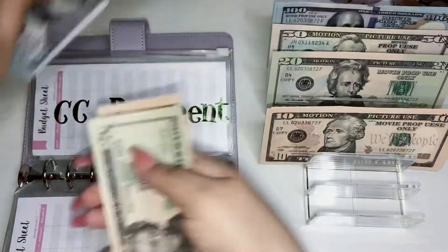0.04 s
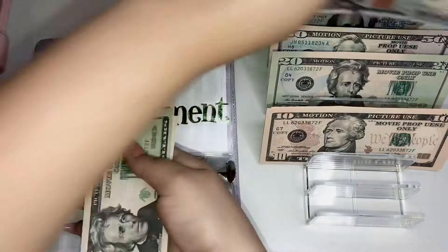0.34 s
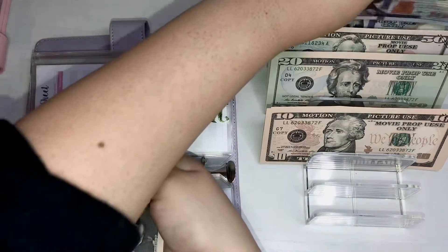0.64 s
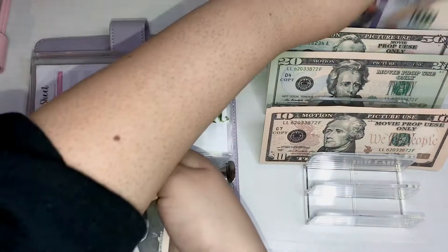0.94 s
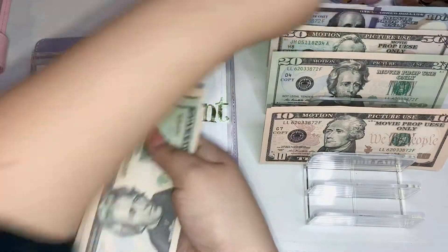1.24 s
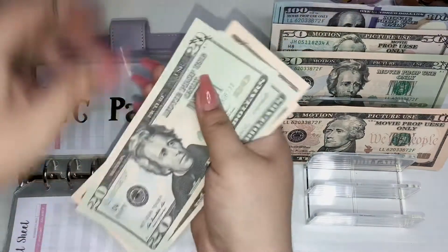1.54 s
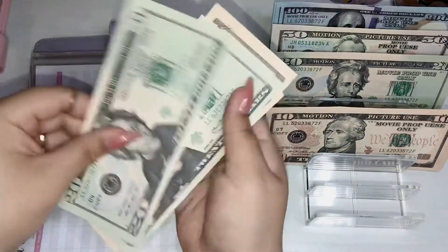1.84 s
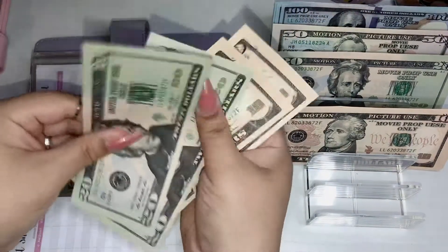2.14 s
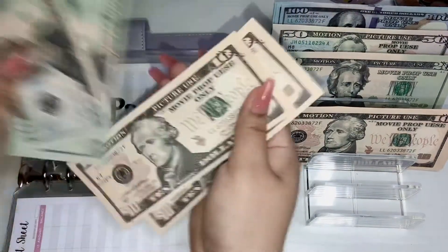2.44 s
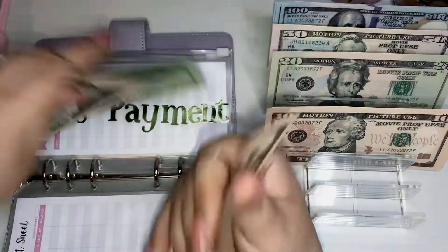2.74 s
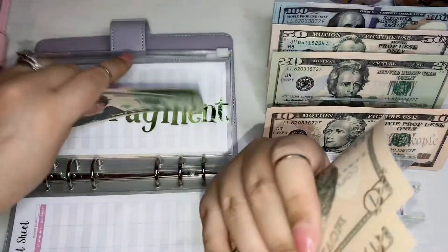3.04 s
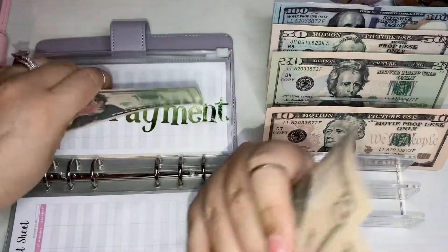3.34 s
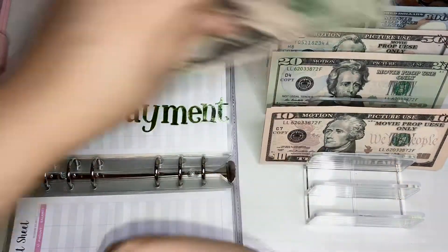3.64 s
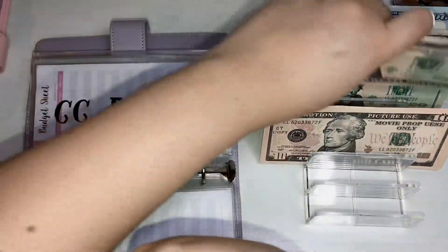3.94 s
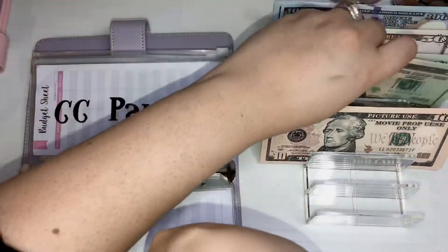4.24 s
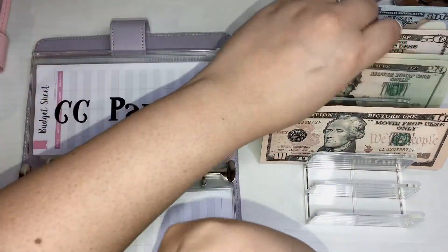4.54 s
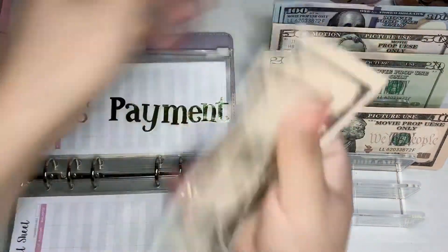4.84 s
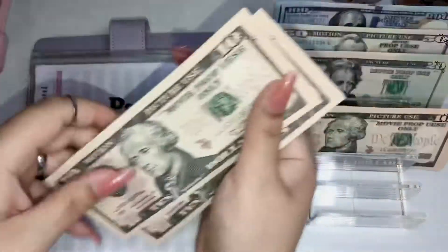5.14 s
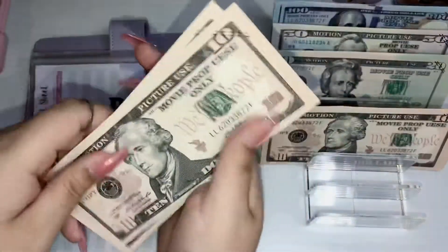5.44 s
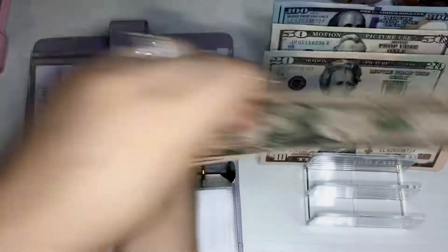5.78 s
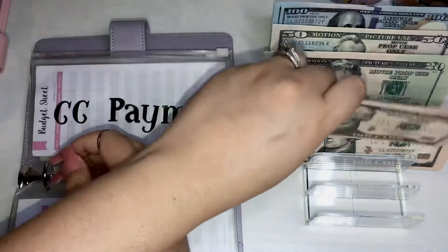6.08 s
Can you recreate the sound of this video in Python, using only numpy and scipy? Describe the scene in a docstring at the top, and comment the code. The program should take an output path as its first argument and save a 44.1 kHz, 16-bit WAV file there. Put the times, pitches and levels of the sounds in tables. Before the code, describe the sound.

Close, crisp handling of paper money: grainy sliding, small snaps and bundles tapping into a plastic tray over a faint hum.

```python
"""Handling paper banknotes

Notes are drawn from a plastic tray, fanned out and laid on a ring binder, close to the microphone.
Sheet slides on sheet with a fine, grainy hiss, and the notes snap and tap as they bend. Twice a bundle
drops back into its slot and knocks the tray. Behind it all is a small, quiet room with a faint hum."""
import sys
import numpy as np
from scipy import signal
from scipy.fft import rfft, irfft
from scipy.io import wavfile

SR = 44100
rng = np.random.default_rng(int(sys.argv[2]) if len(sys.argv) > 2 else 0)


def store_pcm(level_fs):
    """Save levels as 16-bit WAV."""
    pcm = np.round(np.clip(level_fs, -1, 1) * 32767).astype(np.int16)
    wavfile.write(sys.argv[1], SR, np.atleast_2d(pcm).T)


N = 269465
TIME = np.arange(N) / SR

# The paper's tone in three parts, each listed as f/Hz, level/dB:
# the hiss of rubbing fibres
RUB_TONE = [(1200, -19.5), (2200, -3.5), (3000, 0.5), (4300, 1), (6000, -1), (8500, -5), (11000, -23),
            (16000, -22)]
# the lower sound of the whole sheet bending, called its body
BODY_TONE = [(35, -24), (100, -3), (200, -3), (380, 1), (550, -4), (1050, -0.5), (1550, -1.5), (2100, -4.5),
             (3200, -24)]
# the very high hiss of the cut edges
EDGE_TONE = [(6000, -7), (9500, -0.5), (12000, -3.5), (15000, -2.5), (16500, -3)]
# bundles landing in the tray: t/s, level/dB, place (0 = back slot, 1 = front slot)
LANDINGS = [(0.9842, -28.5, 0.037), (4.3315, -38.5, 0.65), (4.3646, -33.5, 0.89), (4.401, -55, 0.55)]


def from_db(db):
    """Turns decibels into a factor to multiply a sound by."""
    return 10 ** (np.asarray(db) / 20)


def unit_level(x):
    """Scales a signal to an average power of 1."""
    return x / np.sqrt(np.mean(x ** 2) + 1e-20)


def at_hz(points, hz):
    """Reads between the rows of a table, giving every octave the same space."""
    known_hz, values = np.transpose(points)
    return np.interp(np.log(np.maximum(hz, 1)), np.log(known_hz), values)


def colour(x, tone, size=2048):
    """Filters a sound to the tone in a table; white noise keeps its power."""
    gains = from_db(at_hz(tone, np.fft.rfftfreq(size, 1 / SR)))
    cepstrum = irfft(np.log(gains))
    # fold the second half onto the first, so the filter rings only after a click, never before
    cepstrum[1:size // 2] *= 2
    cepstrum[size // 2 + 1:] = 0
    response = irfft(np.exp(rfft(cepstrum)))
    return signal.fftconvolve(x, response / np.linalg.norm(response))[:len(x)]


def drift(per_s):
    """A curve that wanders to a new random value per_s times a second."""
    points = rng.standard_normal(int(N / SR * per_s) + 2)
    return unit_level(np.interp(TIME * per_s, np.arange(len(points)), points))


def moving_resonance(x, hz, width_hz):
    """Picks out a band of the sound around a moving pitch."""
    turn = np.exp(2j * np.pi * np.cumsum(hz) / SR)
    decay = np.exp(-np.pi * width_hz / SR)
    return 2 * np.real(turn * signal.lfilter([1 - decay], [1, -decay], x / turn))


def air_and_hum():
    """Ventilation rushes softly and the mains power hums."""
    # ventilation noise: f/Hz, level/dB
    air_tone = [(24, -44), (47, 10), (90, 2.5), (200, 5.5), (400, -8), (800, -9.5), (2000, -17),
                (5000, -22), (10000, -27), (16000, -27)]
    # tones of the hum: f/Hz, level/dB
    hum_tones = [(120, -70.5), (240, -93), (360, -81)]
    hum = sum(np.sqrt(2) * from_db(db) * np.sin(2 * np.pi * (hz * TIME + rng.random()))
              for hz, db in hum_tones)
    air = unit_level(colour(rng.standard_normal(N), air_tone))
    return from_db(-64.5) * air + hum


def finger_strokes():
    """Each stroke grips, swells or fades, then dies away; the loudest one has most say in the tone."""
    # paper sliding over paper or along the tray: start/s, rise/s, length/s, level/dB, swell/dB,
    # then its tone: body/dB, edges/dB, ring/Hz, ring/dB (these three dB values count from the level)
    strokes = [(-0.01, .005, .095, -65, 0, -5.5, -8, 4870, -4),
               (0.087, 0.013, 0.32, -69.5, 0, 0.5, -6, 4800, -3),
               (0.199, .01, 0.069, -68.5, 1, -9, -10, 5500, 4),
               (0.682, .002, 0.23, -63, 2, 0.5, 0.5, 4700, -24),
               (0.909, .02, 0.036, -59, 12, -16, -0.5, 4700, -13),
               (1.241, 0.011, 0.16, -62.5, 11, -10, -3.5, 3300, -13),
               (1.397, .02, 0.11, -56, 4, -9, -1, 6340, 0),
               (1.504, .01, .12, -57, 2.5, -5.5, -2.5, 6440, -21),
               (1.685, .004, 0.07, -64, 5, -1, -3.5, 4500, -17),
               (1.752, 0.043, .19, -54, -2, -5, -2, 4500, -22),
               (1.938, 0.0088, 0.15, -48.5, 2.5, -11, -2.5, 5940, 6.5),
               (2.13, 0.019, 0.038, -52.5, 0, 0, -3, 3500, -15),
               (2.164, .05, 0.29, -52, -2, -9, -1.5, 3800, -0.5),
               (2.268, 0.01, .042, -58, -5, 10, 3, 1700, 4),
               (2.443, 0.024, 0.075, -50, 1, -4.5, -5.5, 3600, -6),
               (2.513, 0.021, 0.18, -52, -10.5, -11, -4, 4900, 1.5),
               (2.73, 0.0035, 0.12, -58.5, -1, -7, -4.5, 5300, 0),
               (2.832, 0.0083, 0.029, -46.5, 15, -2, -5, 4460, 0),
               (2.87, .005, 0.091, -64, -9, -9, -14, 4800, -2), (2.955, .01, .047, -61, 4, 2, -13, 3740, 5),
               (3.004, .014, 0.024, -54, 7.5, -2.5, -5, 3830, 3.5),
               (3.095, .01, .025, -74, 0, 0, 4, 3800, -6), (3.198, 0.0079, 0.041, -65, 7, 5, -6, 3900, 9),
               (3.528, 0.03, 0.081, -56, -5.5, -8.5, -5.5, 3970, -3),
               (3.71, .02, 0.21, -72, -3, -6.5, -6, 3500, -16),
               (3.988, 0.0071, 0.015, -60, -6, 2, -9, 4840, 2),
               (4.088, 0.0025, .08, -57, -4.5, -5, -7, 2940, -4),
               (4.17, .01, 0.13, -68.5, 0, -2, -6, 3270, 3),
               (4.258, .02, 0.087, -57.5, 10.5, -4.5, -4.5, 3100, 11),
               (4.634, 0.049, 0.064, -57.5, 18.5, -4, -10, 4940, 6.5),
               (4.702, .005, 0.067, -64, -2, -7.5, -9, 5000, -18),
               (4.813, .003, 0.059, -54, 13, -9.5, -9, 4230, 4.5),
               (4.919, 0.04, 0.074, -56.5, 10, -3.5, -5.5, 4200, -6),
               (5.014, 0.018, .045, -59.5, -5, -6, -6, 4200, -2),
               (5.094, .015, .025, -67, 0, 2, -5, 4200, -4),
               (5.167, .03, 0.064, -55, -2.5, -1.5, -3.5, 4250, -2),
               (5.224, .01, .11, -60, 4.5, -2, -4, 4260, 3),
               (5.338, 0.011, 0.13, -63, -16, -3.5, -2.5, 4200, -4),
               (5.452, .01, 0.051, -52, 9, -7, -3.5, 4400, -4),
               (5.594, .025, 0.05, -59.5, 4, -1.5, -5, 4540, -8),
               (5.702, .015, 0.1, -64.5, -12, 2, -9, 4200, -8),
               (5.999, .003, 0.041, -55, 9.5, -19, -6, 3400, -21),
               (6.058, .015, 0.059, -56.5, 5, -8, -7, 3300, -12)]
    # held notes never quite rest: level/dB, body/dB, edges/dB, ring/Hz, ring/dB
    held = (-81.5, 1.5, -4, 4204, 3)
    arch_db, release_db_per_s = 2, 720
    power = np.full(N, from_db(held[0]) ** 2)
    tone = np.outer(held[1:], power)
    for start, rise, length, level, swell, *stroke_tone in strokes:
        age = TIME - start
        progress = np.clip(age / length, 0, 1)
        db = level + swell * (progress - .5)
        db -= arch_db * (2 * progress - 1) ** 2   # the fingers move fastest halfway through
        db -= release_db_per_s * np.clip(age - length, 0, .5)
        stroke_power = (from_db(db) * np.clip(age / rise, 0, 1)) ** 2
        power += stroke_power
        tone += np.outer(stroke_tone, stroke_power)
    return 10 * np.log10(power), *(tone / power)


def tiny_slips(per_s, spread_db):
    """Fibres catch and let go, making tiny clicks of uneven size."""
    sizes = from_db(spread_db * np.minimum(rng.exponential(1, N), 5))
    signs = rng.choice([-1, 1], N)
    return unit_level(sizes * signs * (rng.random(N) < per_s / SR))


def sliding_paper(rub_db, body_db, edge_db, ring_db, crease_db, tremble_db, bend_octaves, bend_db):
    """Tiny slips shake the sliding sheet into a hiss, and the sheet or the tray rings."""
    level, body, edge, ring_hz, ring = finger_strokes()
    # the ring and the body waver as the sheet bends
    ring_hz = ring_hz * 2 ** (bend_octaves * drift(per_s=22))
    body = body + bend_db * drift(per_s=22)
    level = level + tremble_db * drift(per_s=140)   # the finger pressure trembles
    fibres = tiny_slips(per_s=24000, spread_db=2.0)
    creases = from_db(crease_db) * tiny_slips(per_s=220, spread_db=-4.5)
    rub = colour((fibres + creases) * from_db(level + rub_db), RUB_TONE)
    ringing = from_db(ring + ring_db) * moving_resonance(rub, ring_hz, width_hz=940)
    coarse_slips = tiny_slips(per_s=3000, spread_db=2.5) * from_db(level + body + body_db)
    edge_slips = tiny_slips(per_s=26000, spread_db=3.5) * from_db(level + edge + edge_db)
    return rub + ringing + colour(coarse_slips, BODY_TONE) + colour(edge_slips, EDGE_TONE)


def nearby_echoes(x, strength=0.067, count=8, size=80):
    """Hands, binder and desk throw sound back within 2 ms; the tone shifts as the hands move."""
    out = x
    for _ in range(count):
        echoes = rng.standard_normal(size) * np.hanning(size)
        reflected = signal.fftconvolve(x, echoes / np.linalg.norm(echoes))[:N]
        out = out + strength * drift(per_s=7) * reflected
    return out


def faint_ticks(per_s=4.6, level_db=-55, spread_db=7.5, body_db=-1.0, edge_db=-17, hz=2640, fade_s=0.01):
    """Creases and fingernails tick at random moments; gives extra rows for the table of snaps."""
    chance = rng.random((120, 3))
    times = np.cumsum(-np.log(1 - chance[:, 0])) / per_s
    return [(start, level_db + spread_db * loudness, body_db, edge_db, hz * 2 ** octaves, fade_s)
            for start, (loudness, octaves) in zip(times, 2 * chance[:, 1:] - 1) if start < N / SR]


def snapping_paper(crack_db, body_db, edge_db, pop_db, hard_snap_db, size=4096):
    """A note buckles with a short pop and flutters to rest; harder snaps start with a sharper click."""
    # notes bending, nails and edges tapping:
    # t/s, level/dB, body/dB, edges/dB (both count from the level), pop/Hz, time to fade by 60 dB/s
    snaps = [(0.2369, -37.5, -1, -20, 1890, 0.022), (0.3098, -48, 8, -12, 1270, .031),
             (1.6188, -44, 4, -8, 397, 0.038), (1.691, -42, -15, 0, 1080, 0.029),
             (1.7191, -38.5, 7, 9.5, 1110, 0.028), (1.735, -38, 0, 6, 5060, 0.025),
             (1.7896, -41, 9.5, -7, 1280, .029), (1.8982, -36, 1, -9, 980, .016),
             (2.5049, -33.5, 4.5, -9, 3860, 0.021), (2.5155, -26.5, -4, -19, 1460, 0.032),
             (2.8022, -32, 3, -7, 1640, .014), (2.809, -26.5, 2, -17, 1600, 0.014),
             (2.824, -24.5, 4, -19, 960, 0.019), (2.829, -28, 5.5, -18, 1490, .011),
             (2.8603, -30, -7, -10, 4000, 0.025), (3.0181, -38.5, 6, -7, 1580, 0.047),
             (3.214, -39, -0.5, -16, 1850, .031), (3.2286, -37, -11, -20, 3530, 0.012),
             (3.2439, -33.5, 1.5, -20, 2000, 0.011), (3.288, -37, 2, -27, 1066, .07),
             (3.307, -40.5, 7, -18, 3760, 0.014), (3.325, -36.5, 1, -19, 2020, 0.036),
             (3.33, -36.5, 2, -20, 3500, 0.021), (3.3448, -36, -5, -17, 1040, 0.036),
             (3.4213, -44.5, 0.5, -15, 875, .018), (3.591, -42, 7, -14, 576, .024),
             (4.0904, -37.5, -1.5, -1, 7200, 0.015), (4.687, -27, -4.5, -30, 5280, 0.058),
             (4.9864, -22.5, -2.5, 2, 2880, 0.025), (4.995, -35, -2, 3, 905, 0.022),
             (5.2014, -37.5, 9, 0, 734, 0.028), (5.2111, -41.5, 11.5, -9, 740, 0.03),
             (5.4579, -29.5, -4.5, -4, 870, 0.02), (5.4706, -30, 3, -9, 5300, 0.021),
             (5.4827, -22, -3, -19, 4600, 0.021), (5.6931, -36.5, -5, 8, 3200, 0.022)]
    out, age = np.zeros(N + size), np.arange(size) / SR
    for start, level, body, edge, hz, fade_s in snaps + faint_ticks():
        fade = from_db(-60 * age / fade_s)
        bursts = rng.standard_normal((3, size)) * fade
        bursts /= np.linalg.norm(bursts, axis=1, keepdims=True)
        bursts[:, 0] += 0.59 * from_db(0.47 * min(level - hard_snap_db, 0))   # the opening click
        snap = from_db(crack_db) * colour(bursts[0], RUB_TONE)
        snap -= from_db(body + body_db) * colour(bursts[1], BODY_TONE)
        snap += from_db(edge + edge_db) * colour(bursts[2], EDGE_TONE)
        pop = np.sin(2 * np.pi * hz * age) * fade
        # a low pop belongs to the body of the sheet and grows with it
        snap += from_db(pop_db + body * (hz < 2300)) * pop / np.linalg.norm(pop)
        at = round(start * SR)
        out[at:at + size] += from_db(level) * snap
    return out[:N]


def tray_knocks(landing_s, size=16384):
    """The edge of a bundle lands and sets the plastic tray ringing."""
    # the tray's own tones: f/Hz, time to fade by 60 dB/s, level/dB hit at the back, level/dB hit at the front
    tray_tones = [(239, 0.065, -16.5, -14.5), (380, 0.14, -23, -17), (769.5, 0.093, 1.5, -12),
                  (985, 0.03, 0.5, 6), (1259, 0.034, -3, 9.5), (1460, 0.028, 6, 6.5), (1640, 0.05, 5, 1.5),
                  (1968, 0.033, 3, 2), (2506, 0.013, 10.5, -11), (2700, 0.015, 10.5, -11),
                  (3000, 0.041, -22, 10.5), (3257, 0.044, -1, 1), (3344, 0.043, -22, 15),
                  (3615, 0.017, -10, -29), (3665, 0.025, 10, -12), (4535, 0.032, -3, -4),
                  (5150, 0.057, -42, -7), (5530, 0.036, -8, -28), (6200, 0.031, -7, -26),
                  (6640, 0.031, -5, -9), (7030, 0.013, 12.5, -32), (8240, 0.031, -3, -31),
                  (9480, 0.017, 1, -40), (10350, 0.017, -1.5, -50)]
    out, age = np.zeros(N + size), np.arange(size) / SR
    for start, level, place in LANDINGS:
        at = round(start * SR)
        for hz, fade_s, back_db, front_db in tray_tones:
            ring = np.sin(2 * np.pi * (hz * age + rng.random())) * from_db(-60 * age / fade_s)
            strength = from_db(level + back_db + place * (front_db - back_db))
            out[at:at + size] += strength * ring * np.minimum(age / landing_s, 1)
    return out[:N]


def sheet_slaps(slap_db, rise_s, fade_s, dull_above_hz, size=4096):
    """At each landing the sheets slap down in a burst of noise, duller towards the front slot."""
    # tone of a slap: f/Hz, level/dB
    slap_tone = [(60, -32), (300, -7.0), (560, -10.5), (850, 2.5), (1300, -1.0), (1950, 1),
                 (2300, -13), (3400, 5.5), (4800, -5), (8000, -7), (16000, -19)]
    out, age = np.zeros(N + size), np.arange(size) / SR
    for start, level, place in LANDINGS:
        loudness = from_db(level + slap_db - 60 * age / fade_s) * np.minimum(age / rise_s, 1)
        slap = colour(rng.standard_normal(size) * loudness, slap_tone)
        dull = signal.lfilter(*signal.butter(1, dull_above_hz, fs=SR), slap)
        at = round(start * SR)
        out[at:at + size] += slap + place * (dull - slap)
    return out[:N]


def wall_echoes(x, build_up_s, size=20000):
    """Many echoes from the walls blur together; the highest sounds die soonest."""
    # how long the room rings: f/Hz, time to fade by 60 dB/s
    fade_times = [(150, 0.34), (700, 0.22), (1700, 0.29), (4000, 0.25), (8000, 0.18), (16000, 0.14)]
    # tone of the echoes: f/Hz, level/dB
    wall_tone = [(200, -0.5), (1800, -5.0), (3500, -15.5), (7000, -16.0), (16000, -19)]
    age, echoes = np.arange(size) / SR, 0
    limits_hz = np.geomspace(100, 17000, 9)
    for low, high in zip(limits_hz, limits_hz[1:]):
        band_filter = signal.butter(2, [low, high], "band", fs=SR, output="sos")
        band = signal.sosfilt(band_filter, rng.standard_normal(size))
        echoes = echoes + band * from_db(-60 * age / at_hz(fade_times, np.sqrt(low * high)))
    echoes = colour(echoes * np.minimum(age / build_up_s, 1) ** 2, wall_tone)
    return signal.fftconvolve(x, echoes / np.linalg.norm(echoes))[:N]


def scene():
    """Paper and tray in the room, the same in both channels."""
    hiss = sliding_paper(rub_db=-2.5, body_db=-1.5, edge_db=1.0, ring_db=-4.0, crease_db=-15.5,
                         tremble_db=1.3, bend_octaves=0.04, bend_db=0.9)
    paper = nearby_echoes(hiss)
    paper += snapping_paper(crack_db=2.0, body_db=4.5, edge_db=1.0, pop_db=3.0, hard_snap_db=-31.5)
    knocks = tray_knocks(landing_s=0.0029)
    slaps = sheet_slaps(slap_db=1.0, rise_s=0.0015, fade_s=0.023, dull_above_hz=7900)
    # the slaps in the tray are further away than the hands, so more of the room comes with them
    to_walls = from_db(-19.5) * paper + from_db(-21.5) * knocks + from_db(-4) * slaps
    mono = paper + knocks + slaps + wall_echoes(to_walls, build_up_s=0.013) + air_and_hum()
    return np.array([mono, mono])


def record(dry):
    """The microphone drops the deep bass, and the very highest sounds are cut steeply."""
    lowest_hz, highest_hz = 34, 16000
    bass_cut = signal.butter(3, lowest_hz, "high", fs=SR, output="sos")
    treble_cut = signal.ellip(10, .2, 70, highest_hz, fs=SR, output="sos")
    return signal.sosfilt(treble_cut, signal.sosfilt(bass_cut, dry))


dry = scene()
out = record(dry)
store_pcm(out)
```